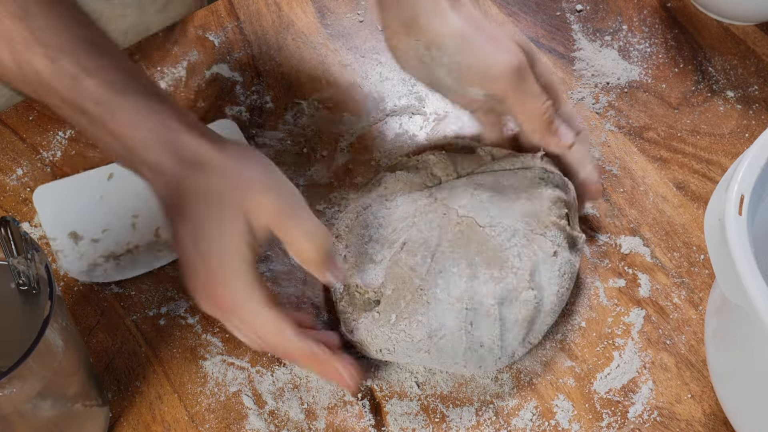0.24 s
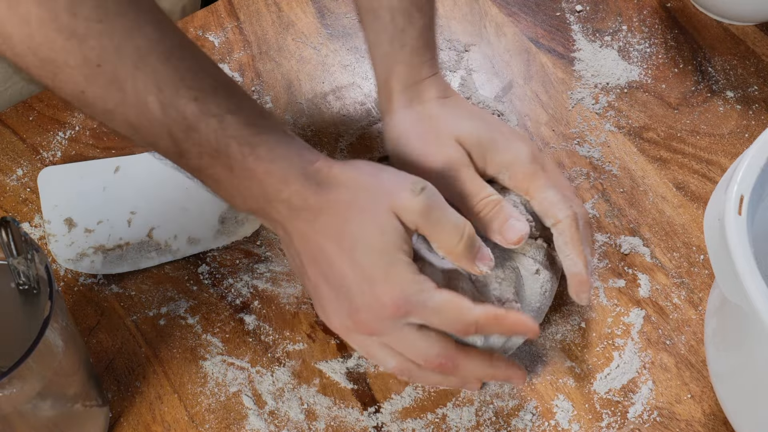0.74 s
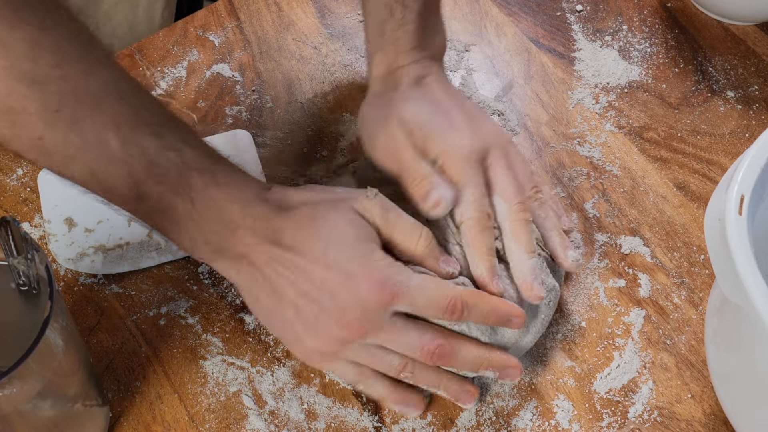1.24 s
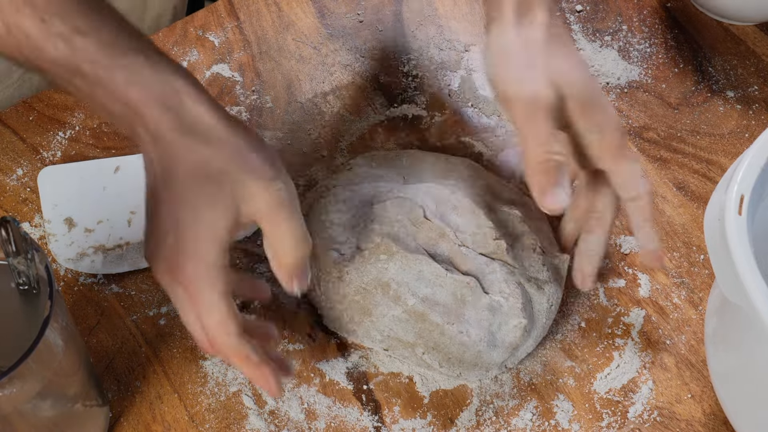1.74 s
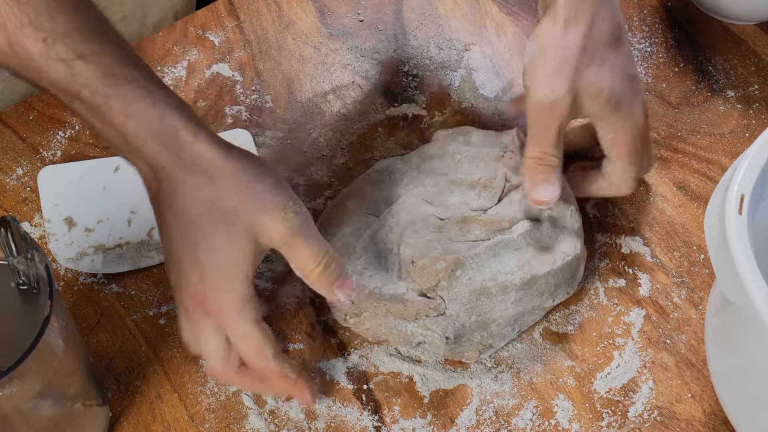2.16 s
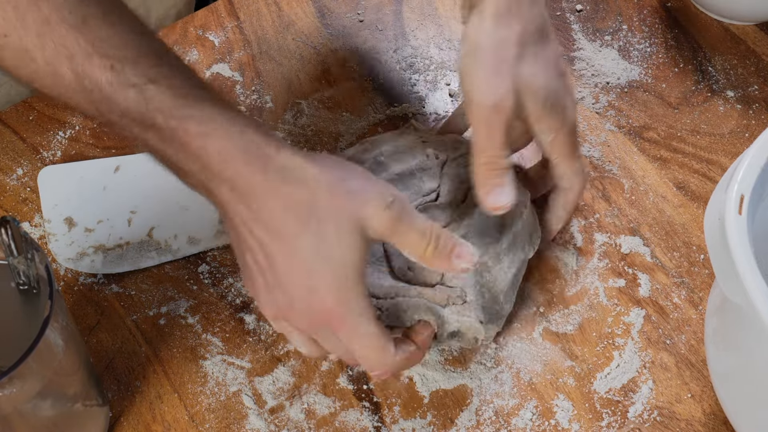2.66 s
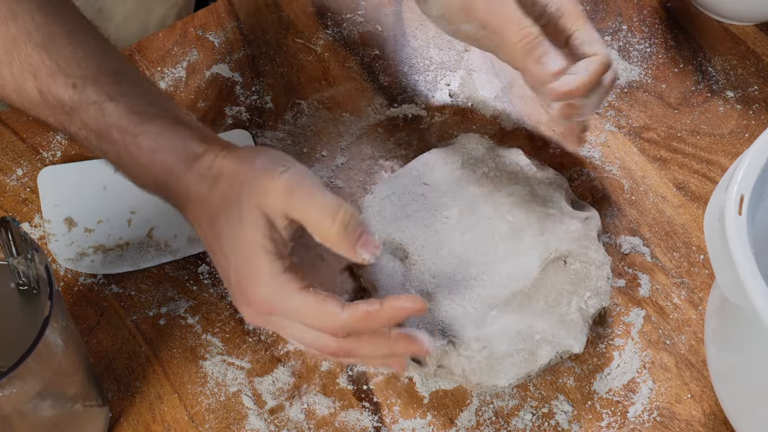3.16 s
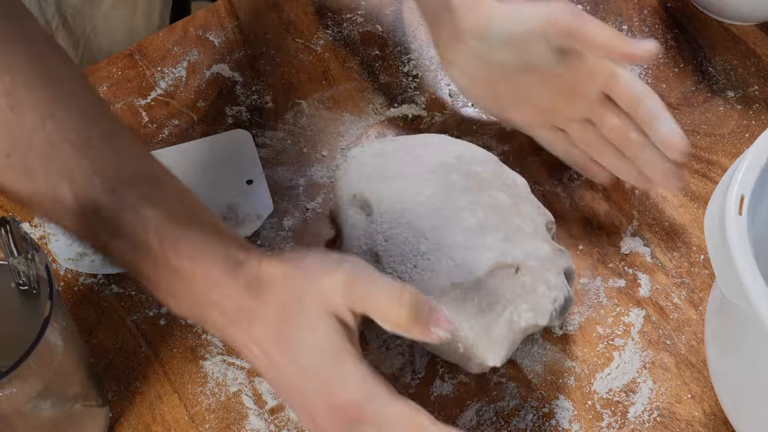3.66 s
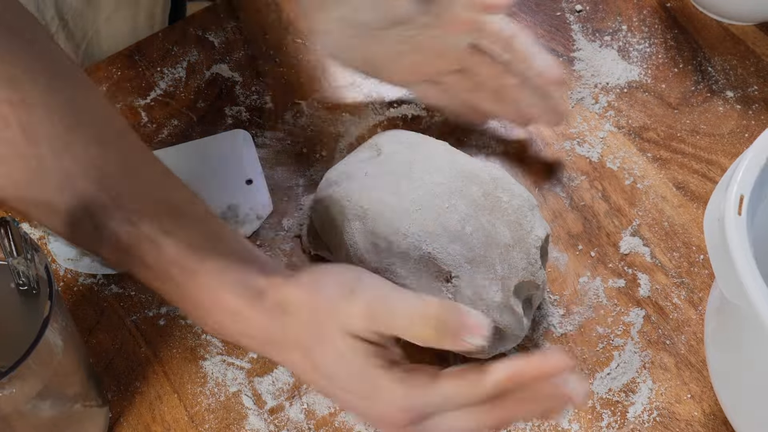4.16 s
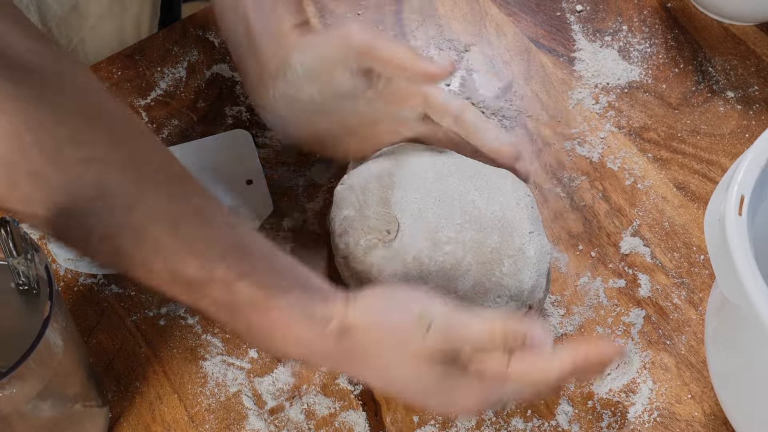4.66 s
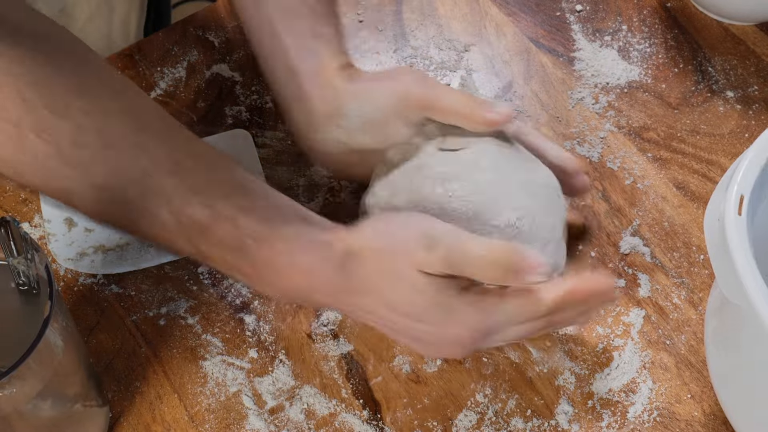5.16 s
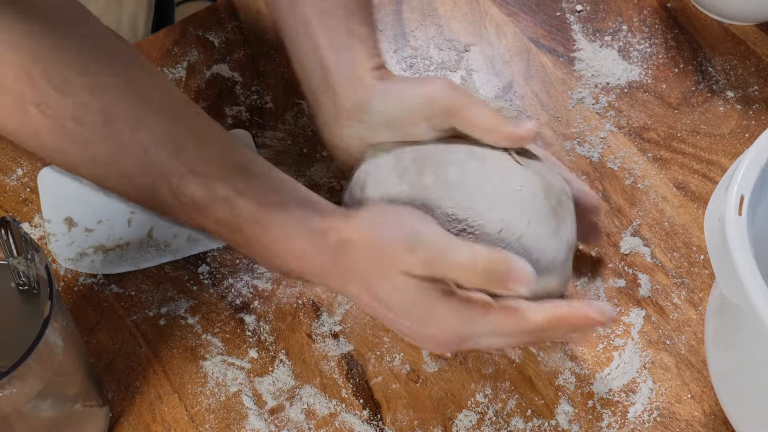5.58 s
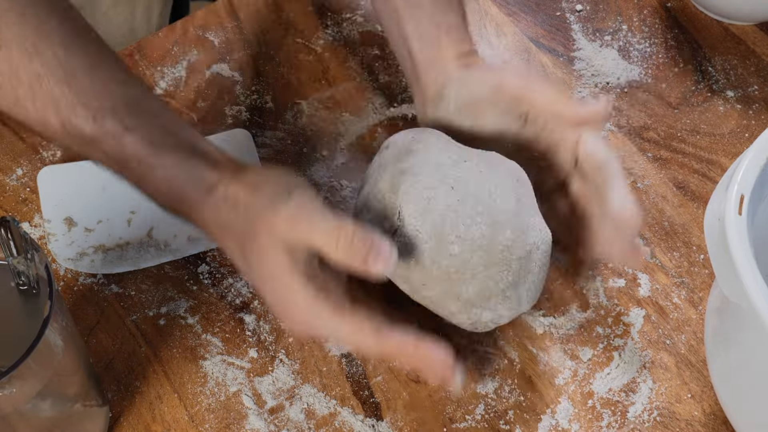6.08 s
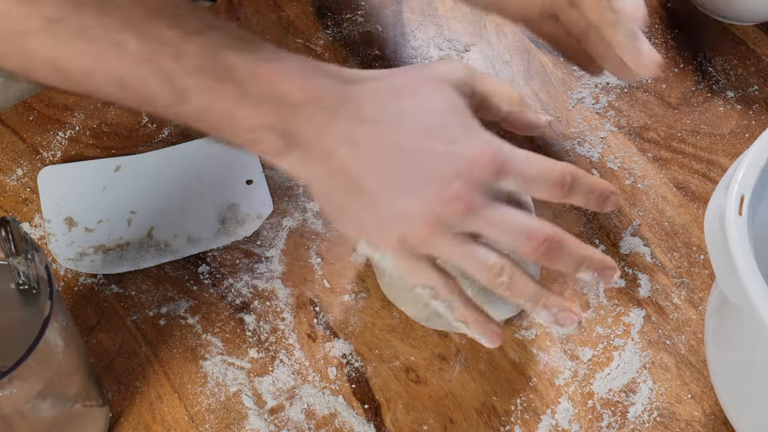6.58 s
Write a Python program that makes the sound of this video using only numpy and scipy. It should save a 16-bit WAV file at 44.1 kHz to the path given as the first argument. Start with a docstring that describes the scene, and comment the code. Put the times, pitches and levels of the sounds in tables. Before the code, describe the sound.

Close, muffled thumps of dough on a wooden board, dry floury scrapes between them, growing heavier, then a brisk run of light slaps.

```python
"""Hands press, turn and pat soft dough on a floured wooden board, heard close up in a small kitchen.
It opens with mostly soft pats and short drags; heavier landings come from about 2.2 s, loudest at 4.3 s,
and after 6.1 s a quick run of pats and slaps whose board ring dies fast. Landings are a low push, decaying
sines and a noise knock; slaps are noise bursts; drags are a shaped hiss over a rumble in the wood.
Throughout, faint room tone lies beneath and a noise gate pulls the quiet moments down."""
import sys
import numpy as np
from scipy import signal
from scipy.fft import rfft, irfft, next_fast_len
from scipy.io import wavfile
from scipy.ndimage import uniform_filter1d

SR = 44100
rng = np.random.default_rng(int(sys.argv[2]) if len(sys.argv) > 2 else 0)


def int16_out(signal):
    """Quantize to a 16-bit WAV file."""
    q = np.round(np.clip(np.atleast_2d(signal).T, -1, 1) * 32767)
    wavfile.write(sys.argv[1], SR, q.astype(np.int16))


N = 301322  # length in samples

# Dough or palm landing on the board. Each row: deepest swing of the push in seconds, push level in dB,
# push pitch in Hz, ring trim against the push in dB, centre of the ring in Hz, damping by the hands as a
# factor on the decay rate, knock trim against the push in dB.
LANDINGS = [(0.0356, -41, 303, 9.5, 230, 0.81, -12), (0.0491, -42, 182, 6, 252, 1.2, 5),
            (0.1985, -38.5, 246, 1, 111.5, 1.3, -4), (0.303, -41, 216.0, 0, 145, 1.5, 4),
            (0.4162, -62, 167.0, 1.5, 102, 0.75, 5), (0.5946, -26.0, 219, -4, 105, 1.07, -10.5),
            (1.029, -48, 130, -5, 140, 0.93, -18.0), (1.0721, -38.5, 241, 2, 92, 0.61, 6.5),
            (1.0964, -32.5, 130, -0.5, 86, 0.62, -3), (1.495, -40.5, 177, -3, 83.5, 0.64, -6.0),
            (1.5172, -30, 70.8, -7, 94, 0.47, -12), (1.867, -30, 175, 0, 204, 0.95, -2),
            (1.9679, -33.5, 114, -4.5, 90, 0.6, -7.5), (2.1759, -20.0, 210, -6, 170, 1.9, -15.5),
            (2.222, -28.5, 177, -0.5, 202, 0.85, -3.5), (2.3708, -34, 186, -4, 109, 0.57, 0),
            (2.5555, -33.5, 294, 0, 216, 0.5, -10), (2.5738, -15.5, 229, -8, 214, 0.8, -8),
            (2.6, -27, 243, -9, 195, 1.5, -1), (2.8272, -47, 235, -14, 154, 0.62, -1.5),
            (2.8717, -49.5, 303, -8, 141, 1.4, -4.5), (2.9262, -52.5, 142, -5.5, 170, 0.64, -11),
            (3.036, -51.5, 186, -15, 128, 1.9, -5), (3.11, -19, 199, -8, 176, 0.88, -10),
            (3.118, -17.5, 197.3, -7.5, 172, 0.57, -5.5), (3.426, -35.5, 151, -4, 95, 1.8, -24),
            (3.8718, -27.5, 115, -12, 119, 0.98, -10), (3.897, -34, 202, -0.5, 121, 0.59, -10.5),
            (4.3077, -12.5, 221, -3, 156, 1.4, -6.5), (4.3331, -19.5, 157.4, -15.5, 160, 0.85, -5.5),
            (4.7301, -17.5, 303, -2.5, 148, 0.75, -2), (5.1472, -29.5, 145, -5.5, 131, 0.53, -23),
            (5.5608, -14.5, 180.5, -8, 168, 0.94, -11.5), (5.6163, -28, 111, -15, 147, 1.2, -17),
            (6.0654, -29, 262, -8.5, 180, 1.2, -13), (6.1532, -30, 164, 1.5, 115, 3.2, -6.5),
            (6.3188, -20, 282, -2, 91, 3.2, -11), (6.397, -29, 228, 2, 120, 2.5, -7.5),
            (6.469, -43.5, 180, -13, 105, 1.3, 1.5), (6.5288, -36.5, 276, -20, 150, 2.6, -3.5),
            (6.558, -20.5, 227, -4, 94, 2.3, -29), (6.685, -27.0, 312, 3.5, 92, 2.8, -1.5)]
# Skin slapping or peeling off the dough. Each row: start in seconds, level trim in dB,
# decay by 60 dB in seconds, treble tilt in dB per octave.
SKIN_SLAPS = [(0.0227, -31, 0.04, 0), (0.0474, -27.5, 0.011, 3.5), (0.0967, -45, 0.033, 4.5),
              (0.302, -51, 0.036, 8), (0.5911, -41, 0.016, 3), (1.0707, -40, 0.033, 10),
              (1.077, -27, 0.011, 3.5), (1.0882, -32.5, 0.025, 3), (1.162, -50, 0.044, 2),
              (1.1767, -48, 0.023, 2), (1.4706, -44.5, 0.071, -1), (1.484, -35, 0.022, 0),
              (1.5105, -38, 0.027, 4.5), (1.8642, -44, 0.051, -4), (2.1725, -43, 0.03, 6),
              (2.5655, -38, 0.035, -0.5), (2.605, -41.5, 0.024, 3.5), (2.7342, -43, 0.038, -2.5),
              (2.9236, -45, 0.088, 12.5), (3.1153, -26, 0.016, -5), (3.8691, -44, 0.028, -12),
              (3.8846, -26.5, 0.013, -4.5), (4.2825, -48, 0.03, 4), (4.3046, -36, 0.056, -3),
              (4.5615, -55, 0.027, -1.5), (4.7274, -31, 0.071, -7), (5.4153, -58.5, 0.063, -3.5),
              (5.5593, -45.5, 0.079, 8), (5.895, -45.5, 0.082, 13), (5.9955, -46, 0.088, 6),
              (6.0714, -41, 0.02, 7.5), (6.1515, -25.5, 0.027, 0.5), (6.3155, -19.5, 0.016, 1.5),
              (6.321, -33.5, 0.019, 3), (6.3994, -36.5, 0.052, 4), (6.4726, -45, 0.068, 11.5),
              (6.553, -22.5, 0.027, 3), (6.6263, -41, 0.03, 0), (6.6814, -36.5, 0.063, 0)]
# Hands and dough dragging over flour. Each row: start in seconds, rise in seconds, hold in seconds,
# fall in seconds, scrape level in dB, fine hiss level in dB, rumble level in dB.
DRAG_STROKES = [(0.0, 0.021, 0.0088, 0.24, -55.5, -75, -49), (0.174, 0.044, .02, 0.12, -66.5, -71, -53.5),
                (0.248, 0.053, .02, 0.18, -62.5, -66, -50), (0.374, 0.016, 0.0072, 0.17, -67.5, -75, -58),
                (0.548, .11, 0.093, 0.12, -59.5, -61, -49.5), (0.784, .11, 0.0071, 0.15, -66, -65.5, -54.5),
                (1.016, 0.021, .01, .08, -78, -73.5, -73), (1.066, 0.0083, 0.011, 0.2, -55, -66, -43.5),
                (1.157, 0.2, .01, 0.025, -58, -62, -48), (1.373, .035, 0.012, 0.052, -75, -78, -57),
                (1.468, 0.026, 0.013, 0.44, -59, -72.5, -44), (1.601, .09, 0.0091, 0.065, -64.5, -63, -49),
                (1.727, 0.036, 0.052, 0.039, -67.5, -71.5, -55),
                (1.835, 0.046, 0.0079, 0.11, -52, -64.5, -42.5), (1.945, 0.049, 0.16, .05, -63.5, -68, -54),
                (2.153, 0.02, 0.027, .35, -57, -63.5, -41.5), (2.32, 0.049, 0.033, 0.47, -63, -70, -49),
                (2.536, 0.066, 0.079, 0.21, -57.5, -64, -41),
                (2.853, 0.02, 0.0073, 0.063, -62.5, -64.5, -57),
                (2.899, 0.019, 0.0091, 0.22, -64, -64, -55.5), (2.993, 0.021, 0.013, 0.028, -74, -76, -69),
                (3.104, 0.0089, 0.0048, 0.19, -59.5, -75, -45), (3.179, 0.022, 0.1, 0.23, -75.5, -80, -51),
                (3.38, 0.046, 0.063, .1, -56.5, -64, -51), (3.437, 0.088, 0.033, 0.13, -52, -55.5, -47),
                (3.668, 0.018, 0.11, 0.1, -70, -73.5, -59), (3.857, 0.026, 0.16, .2, -54, -58.5, -48.5),
                (4.044, 0.045, 0.021, 0.075, -54.5, -57, -56), (4.17, 0.028, 0.041, 0.026, -74, -86, -57),
                (4.274, 0.0073, 0.0091, 0.059, -62, -63.5, -49.5),
                (4.305, 0.035, 0.048, .1, -56.5, -67, -45), (4.319, 0.055, 0.036, 0.46, -50.5, -60.5, -47),
                (4.532, 0.04, 0.0053, 0.031, -54.5, -55, -49), (4.619, .05, .01, 0.047, -61, -68, -56),
                (4.718, 0.016, 0.21, 0.18, -54, -62, -50), (4.909, 0.056, 0.016, 0.13, -75, -60.5, -56),
                (5.08, 0.077, 0.084, 0.12, -57, -60, -49.5), (5.193, 0.097, 0.023, 0.17, -51, -60.5, -49),
                (5.366, 0.053, .01, 0.083, -61.5, -64, -51.5), (5.568, 0.01, .06, 0.042, -59, -64, -52),
                (5.594, 0.053, 0.048, 0.34, -52, -56, -43.5),
                (5.925, 0.075, 0.0067, 0.072, -56.5, -59.5, -48),
                (6.049, 0.038, 0.012, 0.056, -57, -62.5, -46),
                (6.137, 0.015, 0.024, 0.079, -59.5, -62.5, -48.5),
                (6.176, 0.064, 0.039, 0.11, -59, -60.5, -49.5),
                (6.309, .015, 0.022, 0.078, -58.5, -62, -54), (6.372, 0.047, 0.011, 0.026, -58, -59.5, -62),
                (6.464, 0.0086, 0.063, 0.048, -59.5, -67, -49), (6.6, 0.032, .01, 0.07, -63.5, -79, -55),
                (6.673, 0.019, .01, 0.15, -60.5, -68.5, -51.5)]
# Ringing modes of board and table. Each row: pitch in Hz, level in dB,
# decay by 60 dB in seconds with a damping of 1.
BOARD_MODES = [(53.7, 1, 0.51), (82.4, 6.5, 0.2), (127, -1.5, 0.25), (157.2, -7, 0.31),
               (202.7, -30.5, 0.12), (226.2, -17, 0.2), (273, -12, 0.44), (310.5, -3.5, 0.19),
               (406, 0, 0.27), (510.4, -4, 0.32), (590, -5.5, 0.19), (723, -5, 0.2), (824, 2, 0.089),
               (984, -8, 0.22), (1200, -8.5, 0.34)]
# Colour of the knock at first touch. Each row: frequency in Hz, level in dB per Hz.
KNOCK_SPECTRUM = [(200, -39), (400, 6.5), (800, -8), (1250, -13), (1500, -21.5), (2400, -26.5), (4000, -43)]
# Colour of a slap before its tilt. Each row: frequency in Hz, level in dB per Hz.
SKIN_SPECTRUM = [(350, -1.5), (600, 1.5), (833, 6), (1440, -14), (2260, 1.5), (3490, -13.5), (3850, -15),
                 (4920, -11), (6460, -18.5), (8490, -20.5), (15700, -45)]
# Colour of dry friction, with dips from the board's reflection. Each row: frequency in Hz, level in dB per Hz.
FLOUR_SPECTRUM = [(290, -75), (500, -6), (771, -5.5), (865, -5), (1300, -4.5), (1470, -12.5), (1800, -5.5),
                  (2340, -7), (2950, -8.5), (3500, -18.5), (4540, -8.5), (6330, -12.5), (8200, -10.5),
                  (14600, -17.5), (15700, -17)]
# Colour of the rumble in the wood. Each row: frequency in Hz, level in dB per Hz.
RUMBLE_SPECTRUM = [(12, -36), (20, -11.5), (67, 0), (102, -8), (166, -3), (189, -9.5), (369, -10.5),
                   (406, -10), (515, -20.5), (900, -24.5), (1170, -55), (1980, -120)]
# Reverberation of the kitchen. Each row: frequency in Hz, decay by 60 dB in seconds.
KITCHEN_DECAY = [(60, 0.46), (250, 0.35), (1000, 0.13), (4000, 0.11), (15000, 0.32)]
# Colour of the room tone. Each row: frequency in Hz, level in dB per Hz.
AIR_SPECTRUM = [(10, -47), (28, -6.5), (50, 4), (120, 12.5), (400, -32), (2000, -76), (16000, -87)]

RISE_DB, FALL_DB = 19.5, 23.5  # how far below its hold a stroke is at its start and at the end of its fall
RUMBLE_SHARE = 0.83  # the wood swells and fades by this share of the stroke's dB
WOBBLE_DB, WOBBLE_S = 3, 0.0082  # the settling dough damps the ringing board unevenly
PUSH_CYCLES, DEEPEST_CYCLE = 1.7, 0.8305  # length of a push, and where in it the deepest swing falls
KITCHEN_DB, AIR_DB = -11.5, -66.5
GATE_DB, GATE_FALL = -62, 2700.0  # threshold in dB; fall of the followed level in dB per second
EDGE_HZ = 15800  # upper band limit


def thuds():
    """A landing is a soft push under two cycles long, a rough knock at first touch and a ring after it."""
    out, rings = np.zeros(N), np.zeros(N)
    t = np.arange(4096) / SR
    mode_hz = np.transpose(BOARD_MODES)[0]
    variations = rng.standard_normal((len(LANDINGS), len(BOARD_MODES)))
    roughs = rng.standard_normal((len(LANDINGS), len(t)))
    for (s, db, hz, ring_db, ring_hz, damping, knock_db), variation, rough in zip(LANDINGS, variations, roughs):
        touch = s - DEEPEST_CYCLE / hz
        cycles = np.arange(0, PUSH_CYCLES, hz / SR)
        swell = np.sin(np.pi * cycles / PUSH_CYCLES) ** 1.5
        add(out, touch, -gain_of(db) * swell * np.cos(2 * np.pi * (cycles - .75)))

        # modes far from the ring's centre are weaker, and each landing's mode strengths vary at random
        reach_db = -np.minimum(11.6 * np.log2(mode_hz / ring_hz) ** 2, 22)
        ring = board_ring(reach_db + 2 * variation, damping)
        ring_onset = 1 - np.exp(-np.arange(len(ring)) / SR / 0.0032)
        add(rings, s, gain_of(db + ring_db - 3) * ring * ring_onset)

        knock_fade = gain_of(db + knock_db - 7.0 - 60 * t / 0.077)
        knock_onset = 1 - np.exp(-t / 0.0023)
        add(out, touch, knock_fade * knock_onset * evened(coloured(rough, KNOCK_SPECTRUM)))
    return out + rings * gain_of(WOBBLE_DB * wander(WOBBLE_S))


def board_ring(gains_db, damping):
    """The board rings as a sum of decaying sines, each mode started at its own strength."""
    hz, db, t60 = np.transpose(BOARD_MODES)[:, :, None]
    t = np.arange(SR * 2 // 5) / SR
    fade = gain_of(db + gains_db[:, None] - 60 * t * damping / t60)
    return (fade * np.sin(2 * np.pi * hz * t)).sum(0)


def slaps():
    """Short noise bursts with a sharp front; flat palms are dull, fingertips bright."""
    out, t = np.zeros(N), np.arange(4096) / SR
    hz = np.fft.rfftfreq(len(t), 1 / SR)
    noises = rng.standard_normal((len(SKIN_SLAPS), len(t)))
    for (s, db, t60, tilt_db), noise in zip(SKIN_SLAPS, noises):
        colour_db = read(SKIN_SPECTRUM, hz) + tilt_db * np.log2(hz / 3000 + 0.063)
        burst = irfft(rfft(noise) * gain_of(colour_db))
        onset = 1 - np.exp(-t / (0.029 * t60))
        add(out, s, gain_of(db - 2.5 - 60 * t / t60) * onset * evened(burst))
    return out


def drag():
    """Flour grains under skin make a dense fluttering hiss, split into a scrape and a fine top."""
    flutter_db = 1.04 * wander(0.0022) + 1.95 * wander(0.013)
    hiss = coloured(rng.standard_normal(N) * gain_of(flutter_db), FLOUR_SPECTRUM)
    fine = signal.sosfiltfilt(signal.butter(2, 6500, "high", fs=SR, output="sos"), hiss)
    scrape = hiss - fine
    return gain_of(stroke_db(column=4)) * evened(scrape) + gain_of(stroke_db(column=5)) * evened(fine)


def wood_rumble():
    """Pressing and sliding shake the wood: lumpy low noise, partly ringing in the board."""
    noise = rng.standard_normal((2, N))
    tilt_db = -5.0 * np.log2(np.transpose(BOARD_MODES)[0] / 100)
    ringing = signal.fftconvolve(noise[0], board_ring(tilt_db, 0.59))[:N]
    low = coloured(noise[1], RUMBLE_SPECTRUM)
    rumble = evened(evened(low) + gain_of(-2.5) * evened(ringing))
    lumps_db = 2.7 * wander(0.013)
    return gain_of(stroke_db(column=6, share=RUMBLE_SHARE) + lumps_db) * rumble


def stroke_db(column, share=1):
    """One level of the strokes in dB at every sample: each rises, holds and falls, and their powers add."""
    t = np.arange(0, N, 32) / SR
    rows = np.transpose(DRAG_STROKES)[:, :, None]
    start, rise, hold, fall = rows[:4]
    rise_db = RISE_DB * np.maximum(start + rise - t, 0) / rise
    fall_db = FALL_DB * np.maximum(t - start - rise - hold, 0) / fall
    power = (gain_of(rows[column] - share * (rise_db + fall_db)) ** 2).sum(0)
    return np.interp(np.arange(N) / SR, t, 10 * np.log10(power + 1e-12))


def kitchen(x):
    """The room answers with sparse taps of random sign, each band dying at its own speed."""
    taps = np.zeros(SR // 2)
    at = np.arange(200, len(taps) - 20, 20)
    taps[at + rng.integers(0, 20, len(at))] = rng.choice([-1., 1.], len(at))
    hz, t, bands = signal.stft(taps, SR, nperseg=256)
    fade = gain_of(-60 * t / read(KITCHEN_DECAY, hz)[:, None])
    tail = signal.istft(bands * fade, SR, nperseg=256)[1]
    return signal.fftconvolve(x, tail / np.linalg.norm(tail))[:N]


def room_air():
    """Steady room tone: noise with most of its energy in the bass."""
    return gain_of(AIR_DB) * evened(coloured(rng.standard_normal(N), AIR_SPECTRUM))


def gain_of(db):
    """Turns dB into an amplitude factor."""
    return 10 ** (np.asarray(db) / 20)


def evened(x):
    """Scales x to an rms of 1."""
    return x / np.sqrt(np.mean(x ** 2) + 1e-20)


def read(points, hz):
    """Reads a curve between its points, along log frequency."""
    f, value = np.transpose(points)
    return np.interp(np.log(hz + 1), np.log(f + 1), value)


def add(mix, s, sound):
    """Lays a sound into the mix at s seconds, cut off at the end."""
    part = mix[round(s * SR):][:len(sound)]
    part += sound[:len(part)]


def coloured(x, spectrum):
    """Filters x by a spectrum in dB."""
    size = next_fast_len(len(x))
    gain = gain_of(read(spectrum, np.fft.rfftfreq(size, 1 / SR)))
    return irfft(rfft(x, size) * gain, size)[:len(x)]


def wander(seconds):
    """Random drift of rms 1: noise averaged twice over the given time."""
    width = max(round(seconds * SR), 2)
    return evened(uniform_filter1d(uniform_filter1d(rng.standard_normal(N), width), width))


def scene():
    """Landings and slaps excite the room; drags, rumble and room tone are added dry."""
    hits = thuds() + slaps()
    return (hits + gain_of(KITCHEN_DB) * kitchen(hits) + drag() + wood_rumble() + room_air())[None]


def record(dry):
    """A gate follows peaks at once, falls steadily and lowers what stays under threshold; then a band limit."""
    power_db = 10 * np.log10(abs(uniform_filter1d(dry[0] ** 2, 300)) + 1e-12)
    fall = np.arange(N) * GATE_FALL / SR
    followed_db = np.maximum.accumulate(power_db + fall) - fall
    under_db = np.clip(GATE_DB - followed_db, 0, 25)
    gated = dry * gain_of(-.7 * uniform_filter1d(under_db, 100))
    lowpass = signal.firwin(1023, EDGE_HZ, window=("kaiser", 9), fs=SR)
    return signal.oaconvolve(gated, lowpass[None], "same")


dry = scene()
out = record(dry)
int16_out(out)
```